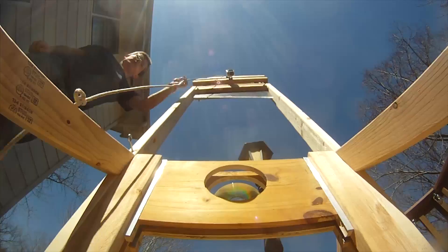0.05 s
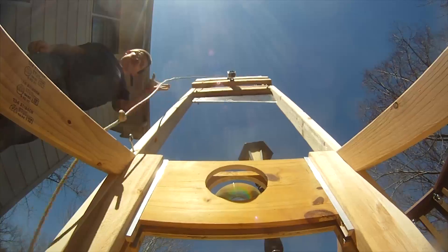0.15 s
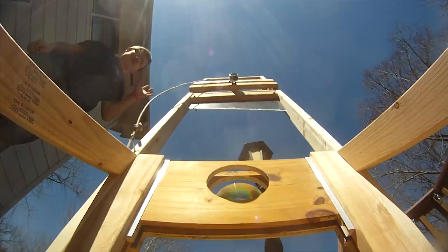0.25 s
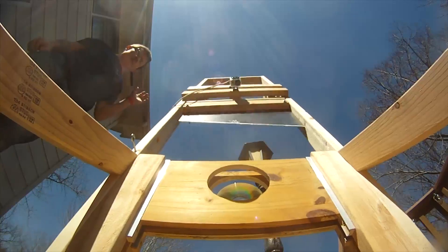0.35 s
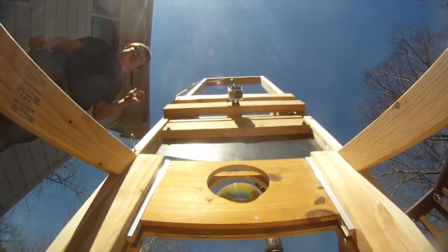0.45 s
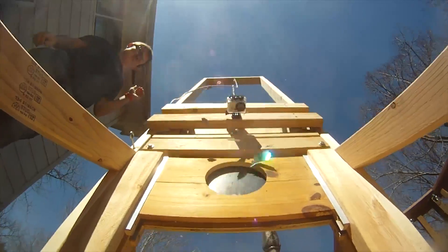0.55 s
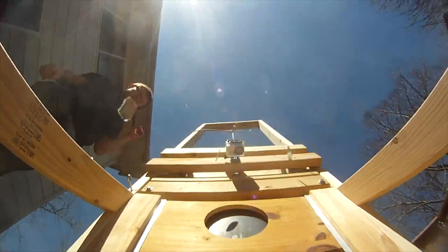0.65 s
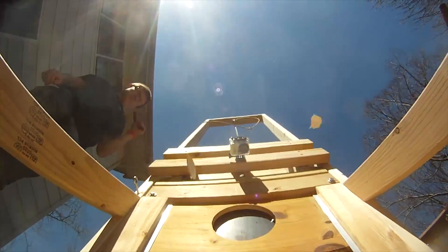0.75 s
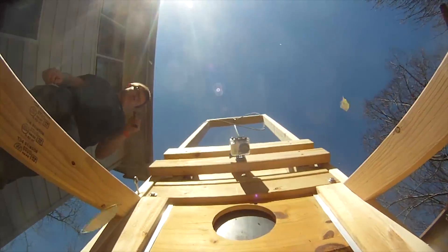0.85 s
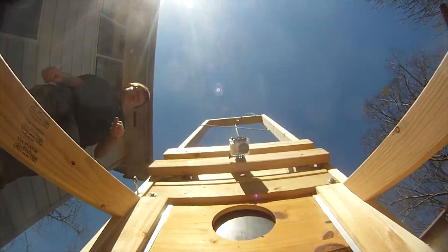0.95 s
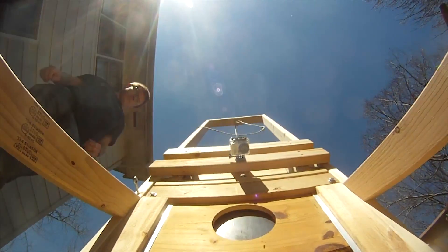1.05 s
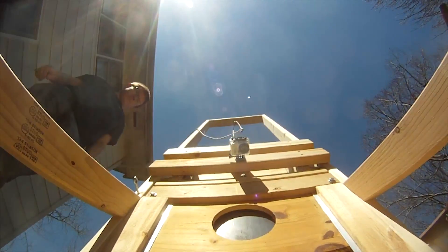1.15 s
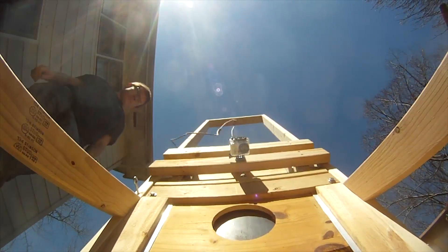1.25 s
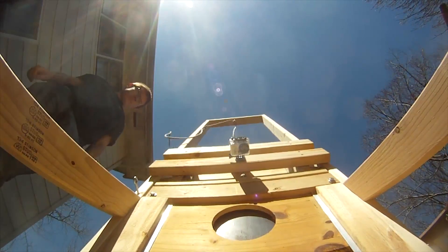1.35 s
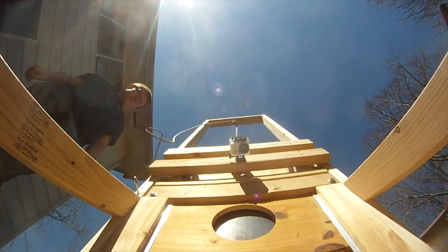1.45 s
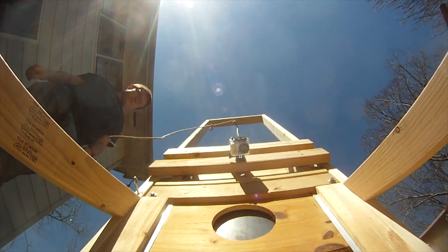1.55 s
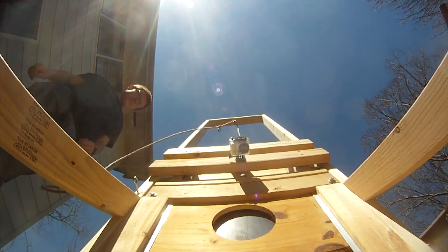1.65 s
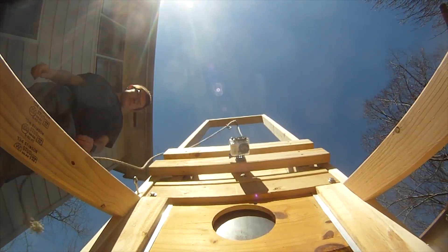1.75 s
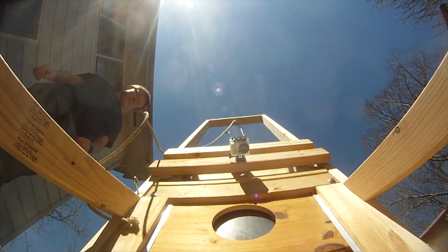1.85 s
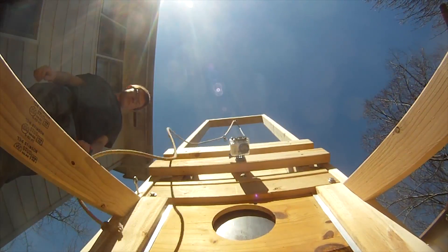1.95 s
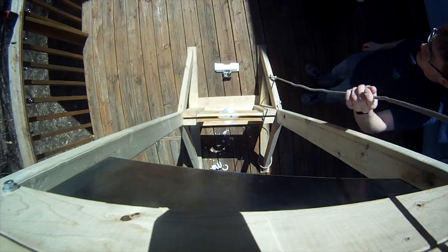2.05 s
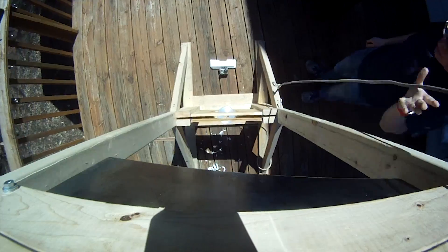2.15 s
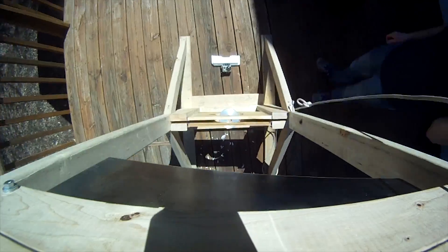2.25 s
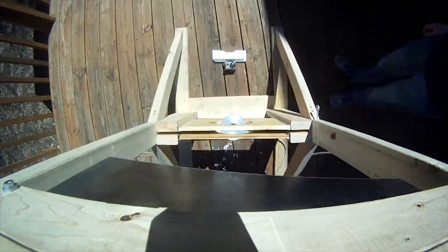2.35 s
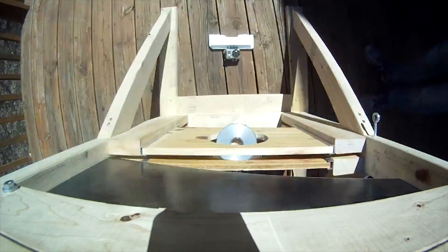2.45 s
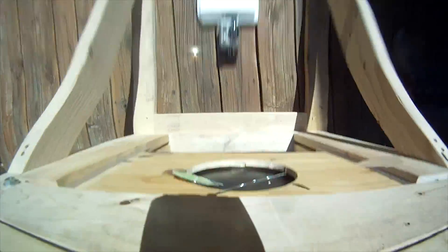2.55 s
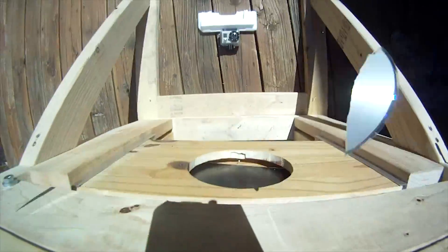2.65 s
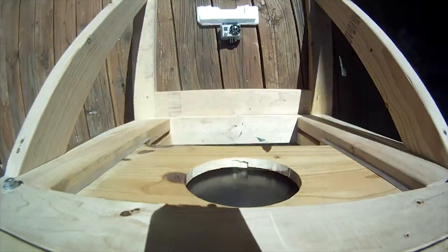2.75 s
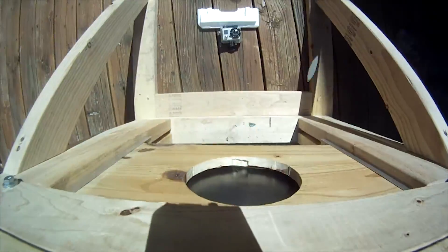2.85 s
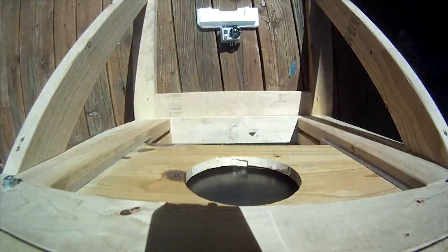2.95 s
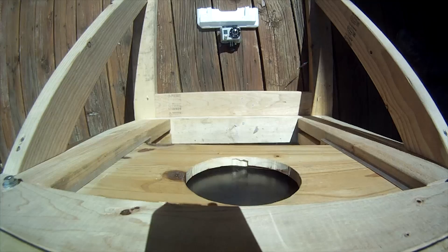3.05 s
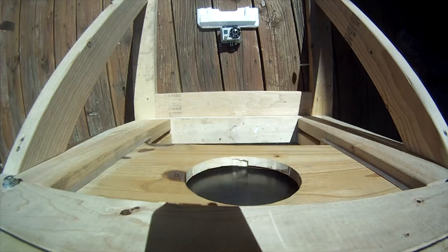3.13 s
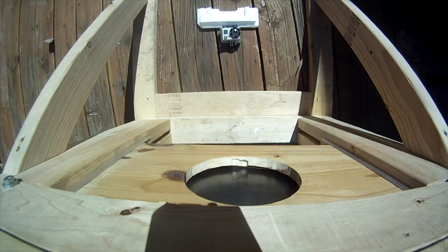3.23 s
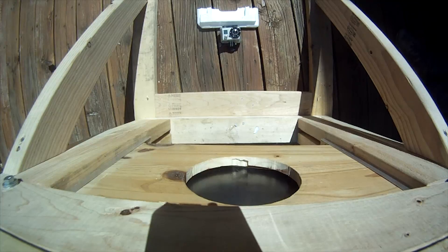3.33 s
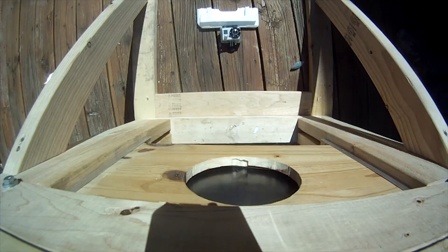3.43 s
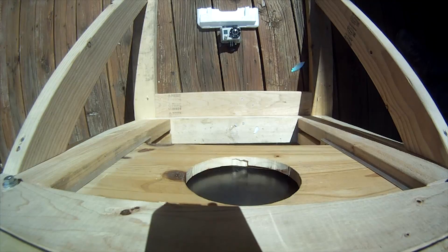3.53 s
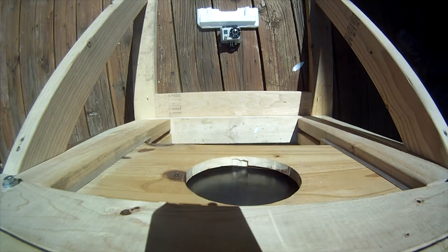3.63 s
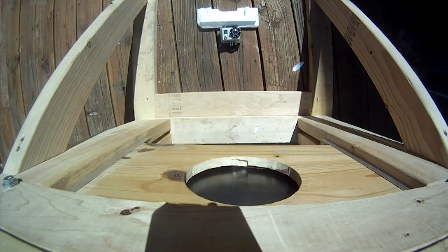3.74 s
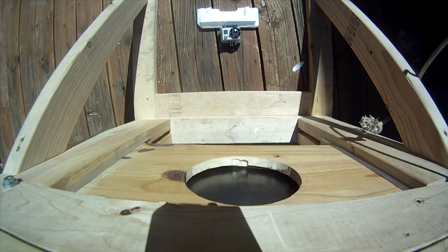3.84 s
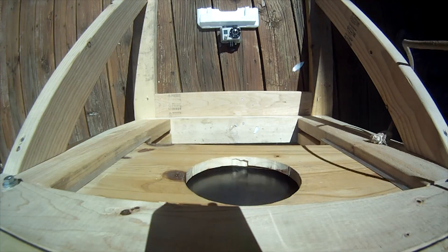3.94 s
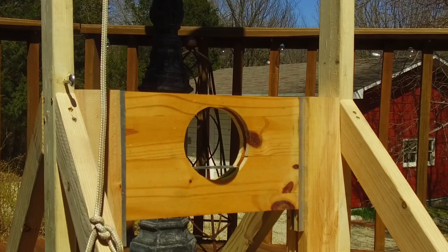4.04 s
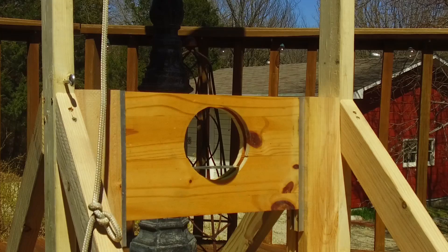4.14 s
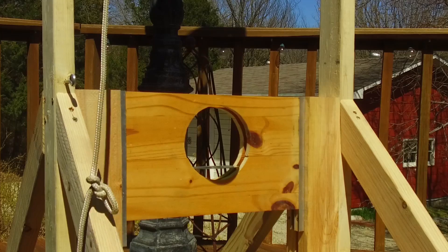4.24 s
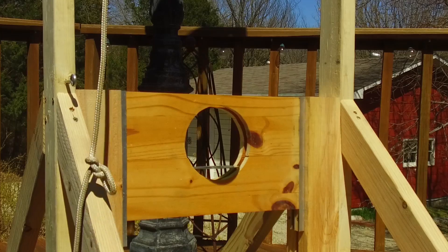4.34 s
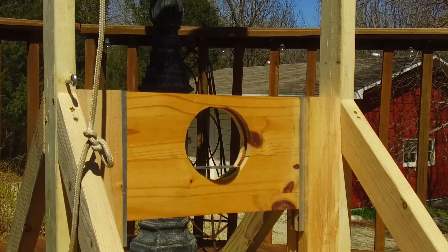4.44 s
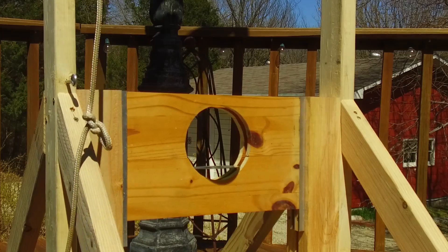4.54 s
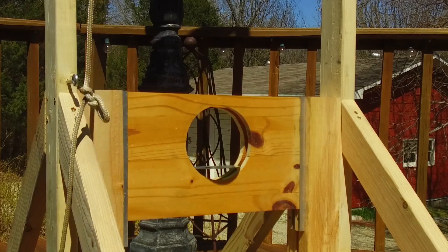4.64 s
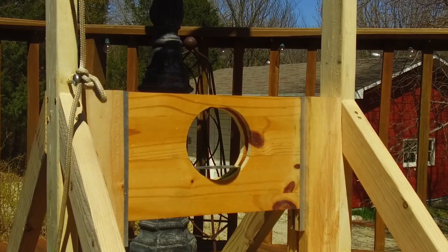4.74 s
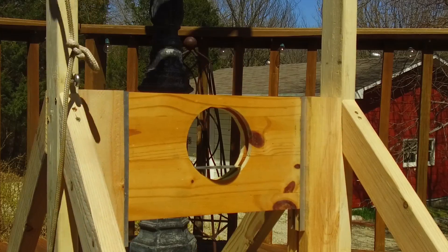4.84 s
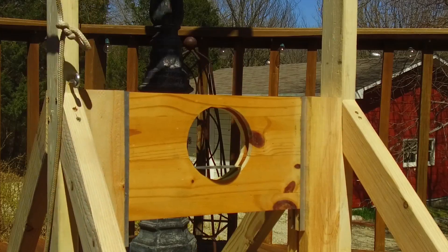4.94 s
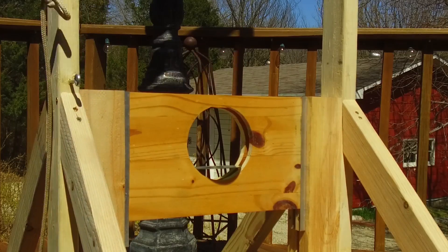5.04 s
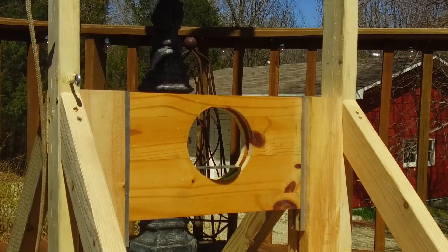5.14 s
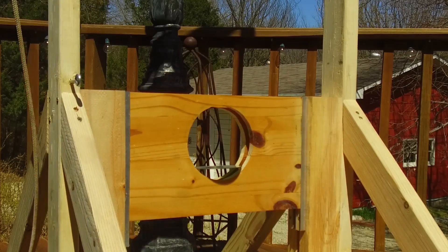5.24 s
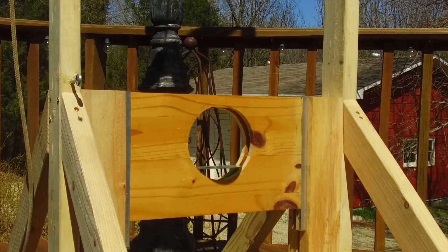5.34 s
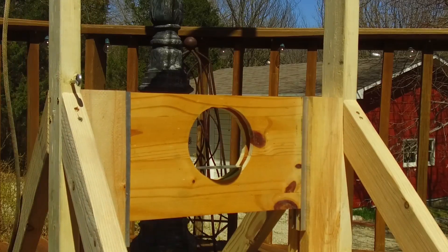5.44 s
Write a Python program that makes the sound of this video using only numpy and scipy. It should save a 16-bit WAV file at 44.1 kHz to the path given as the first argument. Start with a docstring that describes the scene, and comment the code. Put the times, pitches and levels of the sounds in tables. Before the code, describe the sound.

On a quiet outdoor deck, a rope drags and a catch clicks, then a heavy blade carriage scrapes down wooden rails, chatters metallically through a disc and slams into its base with boomy, distorted thumps. Small knocks and a bright shard ping follow. The drop repeats with less bass, then its opening returns slowed and deep. Microphones sit on the structure itself, very close and dry.

```python
"""A home-made wooden guillotine on a deck in quiet outdoor air: a rope drags, the catch clicks, the blade
carriage rubs down its rails, chatters through a disc and slams into the base; a shard pings, the rope flops.
First, microphones on the base and on the blade play together; then the blade's alone repeats the drop; last
comes its opening at quarter speed. Rubbing is filtered random slips; blows are noise puffs and ringing modes."""
import sys
import numpy as np
from scipy import signal
from scipy.fft import rfft, irfft, next_fast_len
from scipy.io import wavfile
from scipy.ndimage import uniform_filter1d, map_coordinates

SR = 44100
rng = np.random.default_rng(int(sys.argv[2]) if len(sys.argv) > 2 else 0)


def put_to_file(sound):
    """Save the sound as 16-bit audio at rate SR, in the file named by the first command-line argument."""
    columns = np.atleast_2d(sound).T  # one column per channel
    safe = np.clip(columns, -1, 1)
    whole_steps = np.round(safe * 32767)
    wavfile.write(sys.argv[1], SR, whole_steps.astype(np.int16))


N = 241976

# Blade-side times [s] are those of the second showing; base-side times are those of the first, REPEAT earlier.
BLADE_FROM, BLADE_TO, REPEAT = 2.068, 4.07, 2.002
SLOW_AT = 4.068  # s, start of the third showing
# The catch is pulled, the carriage runs free, binds until FREE_S, lands, and judders against the base [s]
PULL_S, PULL_END_S, RELEASE_S, FREE_S, LAND_S, JUDDER_END_S = 2.122, 2.136, 2.176, 2.325, 2.568, 2.847

# ringing of the steel blade: (frequency [Hz], level [dB], t60 [s])
STEEL_MODES = [(3960, -3.5, .05), (6875, -7, .03), (6740, -5.5, 0.048), (8770, 3.5, 0.046),
               (10090, -5.5, 0.064), (10710, 1, 0.05), (11930, -12.5, 0.036), (12330, -4, 0.033),
               (14920, -9, .04), (17700, 4, 0.02), (19400, -10, .04), (20200, -11, 0.035)]
# spectrum of a crisp snap: (frequency [Hz], level [dB])
SNAP_SPECTRUM = [(1000, -27.5), (3000, -2), (6000, 2), (7800, 2), (9200, 4.5), (11000, -0.5), (13000, -8.5),
                 (15500, -2.5), (17800, 0.5), (19800, -9), (22000, -14)]
# spectrum of struck wood: (frequency [Hz], level [dB])
WOOD_SPECTRUM = [(100, -35.5), (400, -19.5), (850, 4), (1200, -4), (2200, -0.5), (2900, -3.5),
                 (3800, -23.5), (8000, -26), (20000, -45.5)]
# the base jumping on the deck: (time [s], level [dB], ring of the deck [dB])
BASE_THUMPS = [(0.646, -7.5, -42), (0.662, -11.5, -46), (0.715, -9.5, -44), (0.764, -6.5, -38),
               (0.773, -6.5, -42), (0.819, -7.5, -42), (0.846, -10.5, -36), (0.864, -12, -31),
               (0.914, -14.5, -29), (0.951, -12.5, -28.5), (1.071, -22.5, -19.5), (1.339, -22.5, -27.5),
               (1.461, -33, -36), (1.626, -30, -37), (1.743, -36, -36.5), (1.939, -26, -32.5)]
# resonances of the base's feet: (frequency [Hz], width [Hz], level [dB])
FOOT_RESONANCES = [(108, 110, -1), (230, 220, 1.5), (477, 220, -6.5)]

AGE = np.arange(SR // 6) / SR  # seconds since a blow


def amp(db):
    """Decibels to gain."""
    return np.exp(np.asarray(db) * (np.log(10) / 20))


def unit(x):
    """Each channel at rms 1."""
    return x / np.sqrt(np.mean(x ** 2, axis=-1, keepdims=True) + 1e-20)


def crest(x):
    """Peak 1."""
    return x / (np.abs(x).max() + 1e-12)


def wobble(rate):
    """A smooth random curve, rate knots a second."""
    coarse = np.linspace(0, N, N // 32)
    knots = rng.standard_normal(int(N * rate / SR) + 4)
    curve = map_coordinates(knots, [coarse * rate / SR])
    return np.interp(np.arange(N), coarse, curve)


def filtered(x, response):
    """x times a response of frequency."""
    n = x.shape[-1]
    m = next_fast_len(n + SR // 8)
    spectrum = rfft(x, m) * response(np.fft.rfftfreq(m, 1 / SR))
    return irfft(spectrum, m)[..., :n]


def low_pass(x, top_hz):
    """A steep band limit."""
    return filtered(x, lambda hz: 1 / np.sqrt(1 + (hz / top_hz) ** 200))


def colour(points):
    """The response through (Hz, dB) points on a log axis."""
    f, db = np.transpose(points)
    return lambda hz: amp(np.interp(np.log(hz + 1), np.log(f), db))


def body(resonances):
    """The causal response of (Hz, width Hz, dB) resonances, summed with alternating sign."""
    def response(f):
        total = 0
        for k, (centre, width, db) in enumerate(resonances):
            band = 1j * f * width / (centre * centre - f * f + 1j * f * width)
            total = total + (-1) ** k * amp(db) * band
        return total
    return response


def fade(t60, rise=0.0001):
    """The envelope of a blow: a quick rise and an exponential decay of 60 dB in t60 seconds."""
    return np.exp(-np.log(1000) * AGE / max(t60, .001)) * (1 - np.exp(-AGE / rise))


def burst(spectrum, envelope):
    """A mid and side puff of coloured noise with peak 1."""
    return crest(filtered(rng.standard_normal((2, len(AGE))), colour(spectrum)) * envelope)


def ring(modes, scatter_db, detune):
    """Mid and side ringing, peak 1; each blow shares its force anew among the modes and shifts their pitch."""
    pitch = 1 + detune * rng.standard_normal()
    total = np.zeros((2, len(AGE)))
    for hz, db, t60 in modes:
        level = amp(db + scatter_db * rng.standard_normal())
        phase = rng.random((2, 1))
        total += level * fade(t60) * np.sin(2 * np.pi * (pitch * hz * AGE + phase))
    return crest(total)


def add(track, s, sound):
    """Lay a sound into a track at time s."""
    track[..., round(s * SR):][..., :sound.shape[-1]] += sound


def slips(rate, spread_db):
    """Random tiny slips of uneven force, rate a second, as mid and side impulses."""
    force = (rng.random(N) < rate / SR) * amp(spread_db * rng.standard_normal(N))
    return force * rng.standard_normal((2, N))


def patchy(x, depth_db, hz_size, time_size):
    """The contact points travel, so resonances swell and fade in patches of the spectrogram."""
    z = signal.stft(x, nperseg=512)[2]
    field = uniform_filter1d(rng.standard_normal(z.shape[1:]), hz_size, 0)
    field = uniform_filter1d(field, time_size, 1)
    return signal.istft(z * amp(depth_db * field / field.std()), nperseg=512)[1][:, :N]


def stroke(start, end, attack_s, sag_db_per_s, release_db_per_s):
    """The gain of one spell of contact: it rises, sags (or swells if negative) and dies away after its end."""
    t = np.arange(N) / SR
    held = np.clip(t - start, 0, abs(end - start))
    after = np.maximum(t - end, 0)
    attack = np.clip((t - start) / max(attack_s, .001), 0, 1)
    return attack * amp(-sag_db_per_s * held - abs(release_db_per_s) * after)


def together(*parts):
    """The gain of unrelated (dB, envelope) parts sounding at once: their powers add."""
    return np.sqrt(sum((amp(db) * envelope) ** 2 for db, envelope in parts))


def outdoor_air():
    """Quiet outdoor air: steady coloured noise, independent in mid and side."""
    # (frequency [Hz], level [dB])
    air_spectrum = [(25, -38.5), (60, -16), (150, -4), (600, 4), (2500, -12.5), (5000, -18.5),
                    (14000, -17.5), (20000, -36.5)]
    return amp(-56.5) * unit(filtered(rng.standard_normal((2, N)), colour(air_spectrum)))


def sway():
    """How strongly frame and deck shake: a little at the pull, more in the run, and after each thump."""
    t = np.arange(N) / SR
    land_s = LAND_S - REPEAT
    pull = stroke(PULL_S - REPEAT - .025, FREE_S - REPEAT, attack_s=0.022, sag_db_per_s=10.5,
                  release_db_per_s=100)
    run = stroke(0.25, land_s, attack_s=.11, sag_db_per_s=-5, release_db_per_s=87.5)
    rings = together(*[(db, stroke(s, s, attack_s=0.016, sag_db_per_s=0, release_db_per_s=59))
                       for s, _, db in BASE_THUMPS])
    frame_ring_db = -3.5 - 9.5 * (t - land_s)  # against the deck; the frame settles sooner
    frame = together((-45, pull), (-25.5, run), (frame_ring_db, rings))
    deck = together((-50.5, pull), (-42, run), (0, rings))
    return frame, deck


def shake(modes, drift, waver_db):
    """Low modes beating against each other, each drifting in phase (by cycles) and wavering in level."""
    t = np.arange(N) / SR
    total = np.zeros(N)
    for hz, db in modes:
        level = amp(db + waver_db * wobble(22))
        total += level * np.sin(2 * np.pi * (hz * t + drift * wobble(11)))
    return unit(total)


def structure():
    """Frame and deck hum while the carriage runs and ring after thumps: slow modes plus formless rumble."""
    # slow shaking: (frequency [Hz], level [dB])
    frame_modes = [(80, -7), (60, -13), (299, -22.5)]
    deck_modes = [(143, -7), (177, -1), (206, -8.5), (415, -21)]
    # the formless part: (frequency [Hz], level [dB])
    frame_rumble = [(20, -12.5), (45, 1.5), (90, -4.5), (160, -5), (260, -16.5), (430, -14.5), (700, -41.5)]
    deck_rumble = [(60, -26), (125, -8), (160, 0), (210, -3.5), (270, -20.5), (400, -17), (700, -46.5)]

    def rumble(spectrum):
        return unit(filtered(rng.standard_normal(N), colour(spectrum)))
    frame_gain, deck_gain = sway()
    frame = shake(frame_modes, drift=0.22, waver_db=1.5) + amp(-7.0) * rumble(frame_rumble)
    deck = shake(deck_modes, drift=0.29, waver_db=3.5) + amp(-6.5) * rumble(deck_rumble)
    return frame_gain * frame + deck_gain * deck


def swings():
    """The carriage rocks about seven times a second; each swing is one soft swell of dry rub and hiss."""
    # (time [s], dry rub level [dB], hiss level [dB])
    swing_times = [(2.986, -34, -44.5), (3.157, -38, -43.5), (3.297, -43.5, -46), (3.43, -39, -44.5),
                   (3.609, -43, -52), (3.725, -58, -68), (3.868, -47, -47.5), (4.005, -51.5, -53)]
    t = np.arange(N) / SR
    swells = np.zeros((2, N))
    for s, rub_db, hiss_db in swing_times:
        swells += amp([[rub_db], [hiss_db]]) * np.exp(-.5 * ((t - s) / .021) ** 2)
    return swells


def friction():
    """How hard each spell of contact drives the boards, the frame's boom, the dry rub, hiss and steel."""
    # the rope tightens and drags over the frame, then pulls the scraping catch out
    rope = stroke(2.06, RELEASE_S, attack_s=0.018, sag_db_per_s=-2, release_db_per_s=198)
    pull = stroke(PULL_S, PULL_END_S, attack_s=0.0091, sag_db_per_s=-1, release_db_per_s=518.5)
    # the carriage runs down the rails, binding against them at first
    fall = stroke(RELEASE_S, LAND_S, attack_s=0.093, sag_db_per_s=2.0, release_db_per_s=298.5)
    bind = stroke(2.205, FREE_S, attack_s=0.026, sag_db_per_s=8.5, release_db_per_s=320.5)
    # the blade chatters through the slots of the neck board until it lands
    slots = stroke(2.405, LAND_S, attack_s=.025, sag_db_per_s=6, release_db_per_s=399)
    # the landed carriage judders against the base, each layer at its own pace
    crush_s = 2.595
    judder = stroke(LAND_S, JUDDER_END_S, attack_s=0.016, sag_db_per_s=-2.0, release_db_per_s=118)
    heave = stroke(crush_s, JUDDER_END_S, attack_s=.035, sag_db_per_s=28, release_db_per_s=86.5)
    crush = stroke(crush_s, JUDDER_END_S, attack_s=.015, sag_db_per_s=27.5, release_db_per_s=134)
    grind = stroke(crush_s, JUDDER_END_S, attack_s=.008, sag_db_per_s=35, release_db_per_s=206)
    # it drops back after a hop, over a tremble that dies down
    rebound = stroke(2.74, 2.854, attack_s=.03, sag_db_per_s=0.5, release_db_per_s=165)
    tremble = stroke(LAND_S, BLADE_TO, attack_s=.05, sag_db_per_s=12.5, release_db_per_s=100)
    swing_rub, swing_hiss = swings()

    boards = together((-51.5, rope), (-29, pull), (-24.5, fall), (-29.5, bind), (-27, slots),
                      (-19, judder), (-21, rebound), (-39.5, tremble), (-1.5, swing_rub))
    boom = together((-52.5, rope), (-42, fall), (-19.5, heave), (-45, tremble))
    rub = together((-47, rope), (-35, pull), (-27, fall), (-18, bind), (-26, slots),
                   (-18.5, crush), (-26, rebound), (-39, tremble), (0, swing_rub))
    hiss = together((-55.5, rope), (-43.5, pull), (-40, fall), (-40.5, bind), (-26.5, slots),
                    (-24.5, grind), (-49.5, tremble), (0, swing_hiss))
    steel = together((-19, slots), (-31.5, grind))
    return boards, boom, rub, hiss, steel


def timber(hz):
    """The boards favour their resonances."""
    # (frequency [Hz], width [Hz], level above the rest [dB])
    grain = [(430, 72, 2), (701, 21, 7), (858.6, 16, 10.5), (976, 52, 3), (1069, 95, 2), (1340, 15, 1),
             (1450, 57, 3.5), (1810, 20, 2.5), (1944, 29, 2.5), (2110, 29, 2), (2240, 98, 2.5),
             (2580, 160, 2.5)]
    return amp(sum(db / (1 + (2 * (hz - centre) / width) ** 2) for centre, width, db in grain))


def slide():
    """Stick-slip on the rails sounds the boards, the frame and the loose steel blade."""
    # spectra of boards, boom, dry rub and hiss: (frequency [Hz], level [dB])
    boards_spectrum = [(100, -42.5), (300, -14.5), (520, -10), (720, -5.5), (880, -1), (1100, -1),
                       (1400, -2.5), (1900, -9), (4000, -48)]
    boom_spectrum = [(30, -66.5), (70, -20), (130, -10.5), (250, -4), (430, -1.5), (620, 4.5), (900, -10.5),
                     (2000, -49.5)]
    rub_spectrum = [(500, -41.5), (1100, -18), (1550, -2), (1950, 1), (2350, -1.5), (2850, -6), (3400, -12),
                    (4300, -30), (6500, -36.5), (12000, -59.5)]
    hiss_spectrum = [(1500, -28.5), (3500, 6.5), (5000, 2), (6800, 5), (8000, 0.5), (10200, 3.5),
                     (11500, -4.5), (13500, -13.5), (15500, -6), (18000, -2), (20500, -4), (22000, -20)]
    boards_gain, boom_gain, rub_gain, hiss_gain, steel_gain = friction()
    rocking = amp(0.27 * wobble(170) + 0.86 * wobble(35))  # the carriage rocks between the rails

    def wooden(spectrum):
        sound = filtered(slips(rate=9000, spread_db=2.5), lambda hz: colour(spectrum)(hz) * timber(hz))
        return unit(patchy(sound, depth_db=1.66, hz_size=2, time_size=8))

    def glinting(sound):
        return unit(patchy(sound, depth_db=5.5, hz_size=7, time_size=4))
    boards = boards_gain * wooden(boards_spectrum)
    boom = boom_gain * wooden(boom_spectrum)
    rub = rub_gain * wooden(rub_spectrum)
    grit = filtered(slips(rate=14000, spread_db=2.0), colour(hiss_spectrum))
    # the slots damp the blade while they touch, so its resonances are broad
    blade = body([(hz, 6.5 / t60, db) for hz, db, t60 in STEEL_MODES])
    steel = filtered(slips(rate=2000, spread_db=0.5), blade)
    bent = np.arange(N) + np.cumsum(np.gradient(wobble(25)) * 4)  # changing pressure bends its pitch
    steel = np.array([map_coordinates(channel, [bent]) for channel in steel])
    treble = hiss_gain * glinting(grit) + steel_gain * glinting(steel)
    return boom + rocking * (boards + rub + treble)


def add_clicks(track):
    """Catch, rope and splinters click: a snap with a weak scatter from the frame, over a wooden body."""
    # (time [s], level [dB], wooden body against the snap [dB], t60 of the snap [s])
    click_times = [(2.1013, -19.5, -6.5, 0.017), (2.1228, -14, -12.5, 0.0084), (2.1264, -21, -1, 0.015),
                   (2.2341, -20.5, -2, 0.015), (2.351, -24.5, -3.5, 0.075), (2.6104, -9, -12, .014),
                   (2.7647, -18, -1, .012), (2.8133, -12, -2, .012), (2.8214, -11, 2, .012),
                   (3.0101, -22, -8, .018), (3.1415, -20, -24, 0.011), (3.3444, -29.5, 5, .012),
                   (3.4176, -33, -2, 0.022), (3.62, -36.5, -6, 0.14), (3.8382, -23, -14, 0.029),
                   (3.9993, -36, -8, 0.019)]
    for s, db, wood_db, t60 in click_times:
        snap = burst(SNAP_SPECTRUM, fade(t60) + amp(-21) * fade(0.19))
        wood = burst(WOOD_SPECTRUM, fade(2 * t60))
        add(track, s, amp(db) * (snap + amp(wood_db) * wood))


def add_clacks(track):
    """Wood knocks on wood: a noisy thud with a longer tail and one ringing plank mode."""
    # (time [s], level before a 3 dB cut [dB], plank ring [Hz], t60 of the thud's start [s])
    clack_times = [(2.1804, -16, 2213, 0.076), (2.501, -5.5, 865, 0.12), (2.576, -3, 1071, 0.081),
                   (2.611, -2.5, 2338, 0.082), (3.314, -11.5, 1255, 0.065), (3.575, -29.5, 2440, 0.043),
                   (3.817, -30.5, 2220, 0.056), (3.9, -22, 1740, 0.035), (3.909, -25, 1340, 0.076),
                   (3.955, -29.5, 1037, 0.056)]
    for s, db, hz, t60 in clack_times:
        plank = ring([(hz, 0, 1.5 * t60)], scatter_db=0, detune=0)
        thud = burst(WOOD_SPECTRUM, fade(t60) + amp(-2.5) * fade(3 * t60))
        add(track, s, amp(db - 3) * (thud + amp(-8) * plank))


def add_clinks(track):
    """The blade strikes its slots and the disc: steel modes ring behind a tiny snap."""
    # (time [s], level before a 3.5 dB cut [dB])
    clink_times = [(2.4091, -7.5), (2.4214, -6), (2.4431, -5), (2.4753, -10.5), (2.5262, -7),
                   (2.5646, -7.5), (2.571, -7), (2.6668, -9.5)]
    for s, db in clink_times:
        blade = ring(STEEL_MODES, scatter_db=3, detune=.008)
        snap = burst(SNAP_SPECTRUM, fade(0.0034))
        add(track, s, amp(db - 3.5) * (blade + amp(-4.0) * snap))


def add_skips(track):
    """A shard of the disc lands and skips: high modes ping with a snap and its scatter."""
    # (time [s], level before a 0.5 dB lift [dB])
    skip_times = [(3.035, -12), (3.2241, -40), (3.3877, -49), (3.489, -33)]
    # ringing of the shard: (frequency [Hz], level [dB], t60 [s])
    shard_modes = [(6300, 0, 0.098), (6220, 7.5, 0.032), (6960, -14, 0.06), (7960, -5, 0.058),
                   (8970, 0, 0.11), (9000, -25, 0.055), (9850, -21, .06), (11000, -8, 0.16),
                   (11480, -8, 0.091), (14100, -17, .07), (13500, -15, .06), (14000, -4, 0.12)]
    for s, db in skip_times:
        shard = ring(shard_modes, scatter_db=2, detune=.002)
        snap = burst(SNAP_SPECTRUM, fade(0.011) + amp(-9.5) * fade(0.18))
        add(track, s, amp(db + 0.5) * (amp(-2.5) * shard + amp(-1) * snap))


def contacts():
    """Single blows near the blade; such small parts radiate little below 220 Hz."""
    track = np.zeros((2, N))
    add_clicks(track)
    add_clacks(track)
    add_clinks(track)
    add_skips(track)
    return filtered(track, lambda hz: hz ** 2 / (hz ** 2 + 220 ** 2))


def thumps():
    """The base jumps on the deck: short pushes ring its feet, and it chatters between the big thumps."""
    feet = np.zeros(N)
    push = crest(filtered(fade(0.0062, rise=0.00049), body(FOOT_RESONANCES)))
    for s, db, _ in BASE_THUMPS:
        add(feet, s, amp(db) * push)
    jumping = stroke(0.744, 0.76, attack_s=0.0079, sag_db_per_s=19, release_db_per_s=90)
    rattle = unit(filtered(slips(rate=300, spread_db=3)[0], body(FOOT_RESONANCES[:2])))
    return feet + amp(-29) * jumping * rattle


def knocks():
    """The carriage hits the base, then small knocks on the frame: crushing noise through wood resonances."""
    # (time [s], dull level before a 2.5 dB lift [dB], bright level before a 0.5 dB lift [dB])
    knock_times = [(0.615, -9, -9), (0.629, -14, 0.5), (0.642, -15, -4), (0.649, -1.5, 2), (0.662, -4, -19),
                   (0.701, -8, -24), (0.723, 0, -4.5), (1.073, -31, -22), (1.121, -32, -37),
                   (1.178, -29, -27.5), (1.36, -25.5, -33), (1.461, -23, -21), (1.627, -25, -20),
                   (1.731, -30.5, -32.5), (1.864, -42, -32.5), (1.943, -30.5, -37.5)]
    # resonances of the base: (frequency [Hz], width [Hz], level [dB])
    dull_resonances = [(610, 180, -3.5), (870, 220, 0), (1438, 140, -0.5), (1900, 880, -12)]
    bright_resonances = [(1930, 520, -6.5), (2210, 240, 6), (2600, 260, 2), (3350, 150, -9.5),
                         (3880, 240, -14.5), (9900, 490, -10), (14500, 530, -13.5)]

    def crushed(resonances):
        fibres = rng.standard_normal(len(AGE)) * fade(0.016, rise=0.0016)  # they give for a few ms
        return crest(filtered(fibres, body(resonances)))
    track = np.zeros(N)
    for s, dull_db, bright_db in knock_times:
        add(track, s, amp(dull_db + 2.5) * crushed(dull_resonances))
        add(track, s, amp(bright_db + 0.5) * crushed(bright_resonances))
    return track


def base_camera():
    """Shocks come straight through the wood, so both channels are alike."""
    return structure() + thumps() + knocks()


def blade_camera():
    """The whole drop in left and right, over quiet outdoor air."""
    # side against mid: (frequency [Hz], level [dB])
    width = [(100, -37), (380, -29), (700, -16.5), (1290, -11.5), (2380, -11), (4400, 1.5), (8100, -5),
             (15000, -4)]
    mid, side = outdoor_air() + slide() + contacts()
    side = filtered(side, colour(width))
    return np.array([mid + side, mid - side]) * amp([[.35], [-.35]])  # left slightly louder


def slowed(x):
    """Quarter speed: samples spread four apart and low-passed last four times as long, two octaves lower."""
    slow_from, slowdown, top_hz = 2.0685, 4, 5800  # s, times, Hz
    spread = np.zeros((2, N + SR // 8))
    slow_samples = spread[:, round(SLOW_AT * SR)::slowdown]
    slow_samples[:] = slowdown * x[:, round(slow_from * SR):][:, :slow_samples.shape[1]]
    return low_pass(spread, top_hz)[:, :N]


def scene():
    """Three showings of the same drop, cut one after the other; the third ends as the chatter begins."""
    t = np.arange(N) / SR

    def shot(start, end):
        return np.clip(np.minimum(t - start, end - t) / .004, 0, 1)  # 4 ms fades
    drop = blade_camera()
    early = np.roll(drop, -round(REPEAT * SR), axis=1)
    first = early * shot(0, BLADE_FROM) + base_camera() * shot(BLADE_FROM - REPEAT, BLADE_FROM)
    second = drop * shot(BLADE_FROM, BLADE_TO)
    third = slowed(drop) * shot(SLOW_AT, N / SR)
    return first + second + third


def record(dry):
    """The slam overloads the input, which clips at full scale; a steep limit then cuts above 15850 Hz."""
    return low_pass(np.clip(dry, -1, 1), 15850)


dry = scene()
out = record(dry)
put_to_file(out)
```